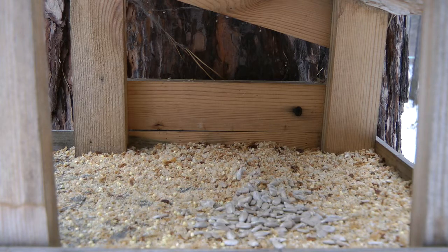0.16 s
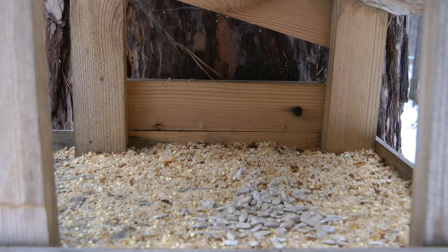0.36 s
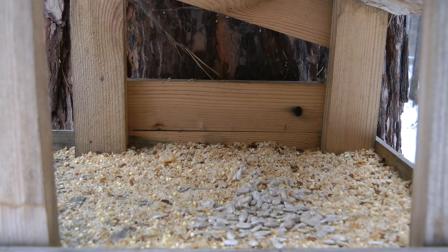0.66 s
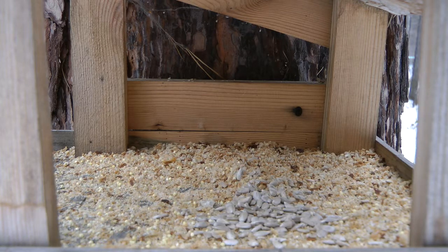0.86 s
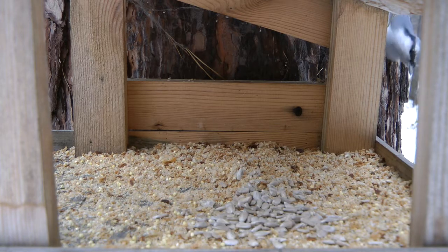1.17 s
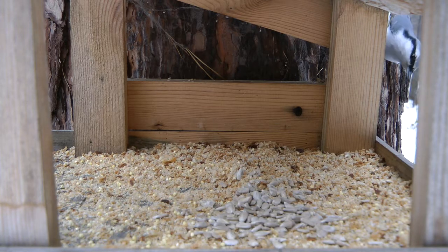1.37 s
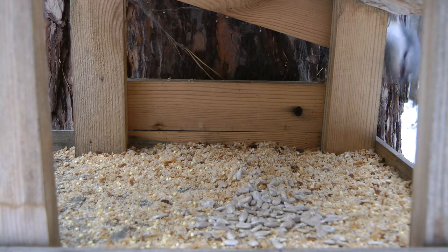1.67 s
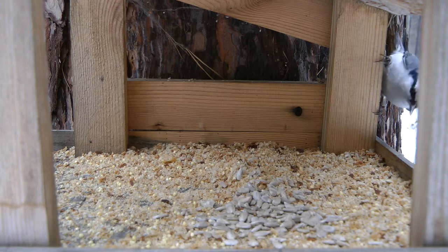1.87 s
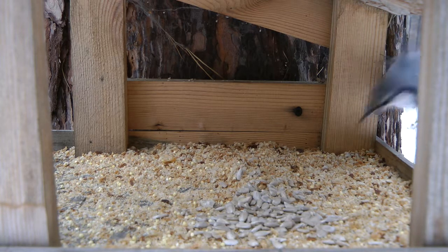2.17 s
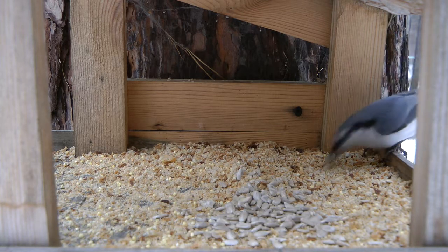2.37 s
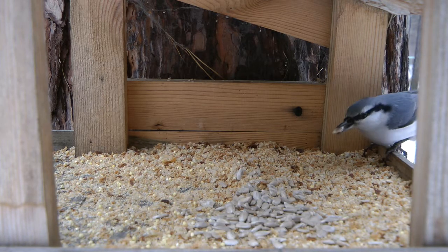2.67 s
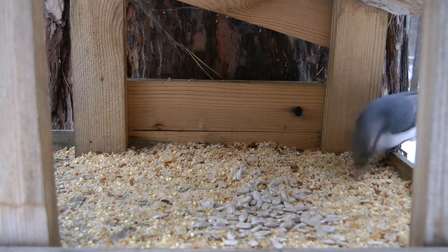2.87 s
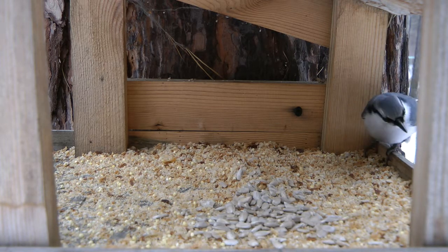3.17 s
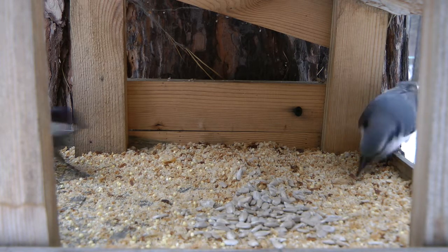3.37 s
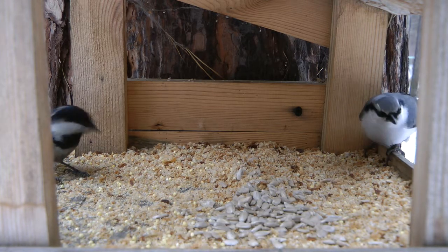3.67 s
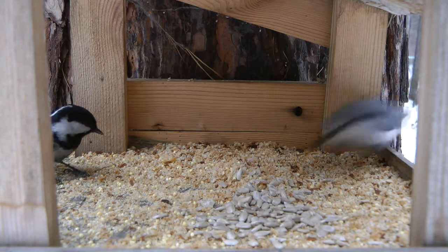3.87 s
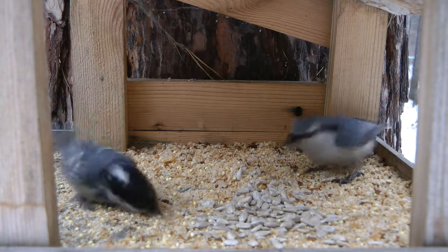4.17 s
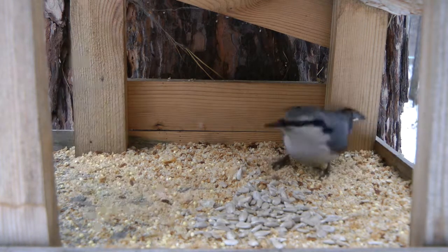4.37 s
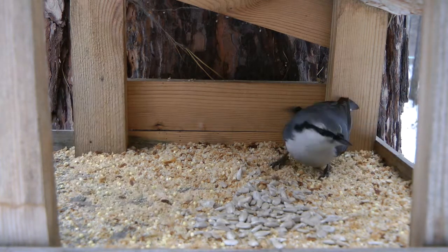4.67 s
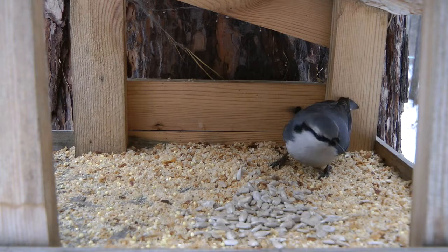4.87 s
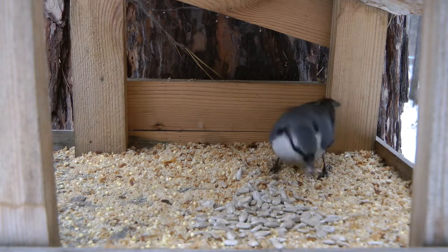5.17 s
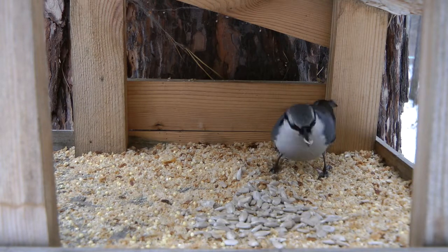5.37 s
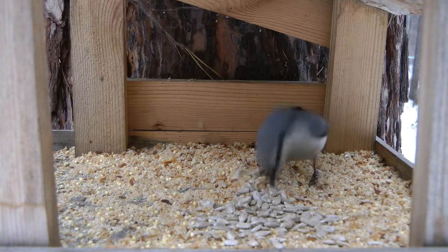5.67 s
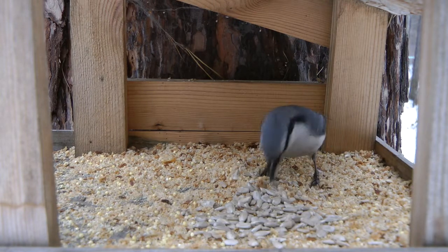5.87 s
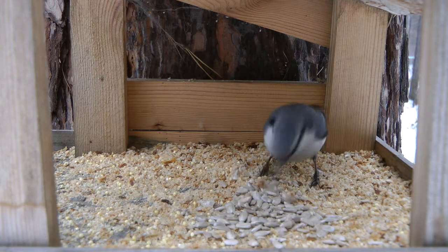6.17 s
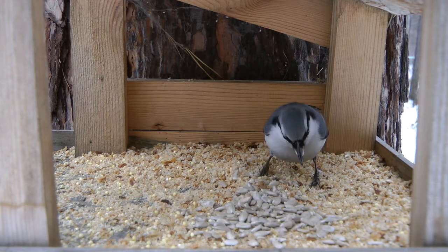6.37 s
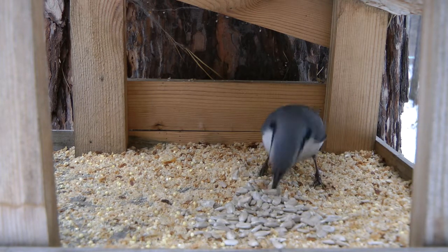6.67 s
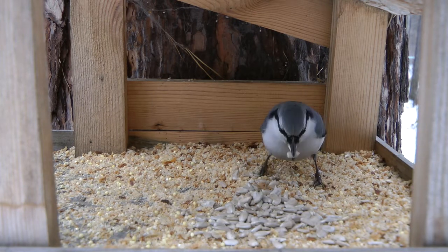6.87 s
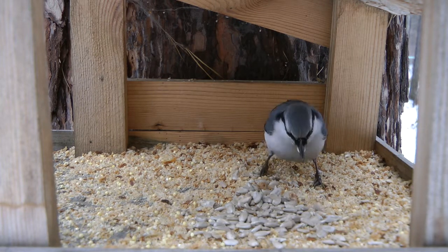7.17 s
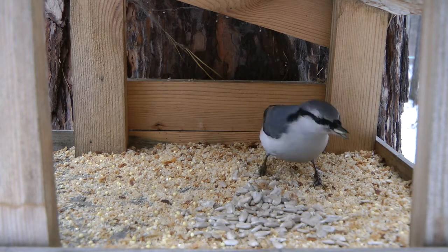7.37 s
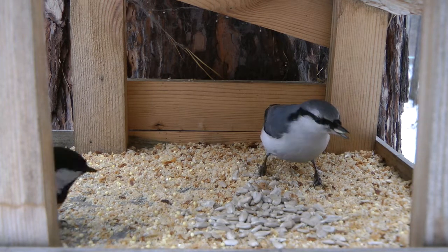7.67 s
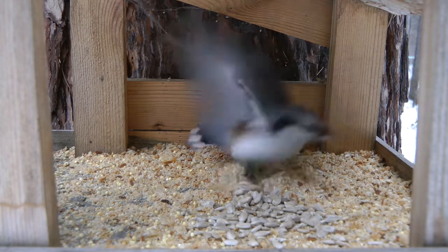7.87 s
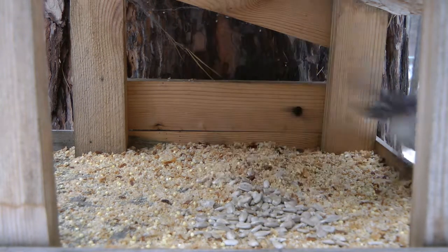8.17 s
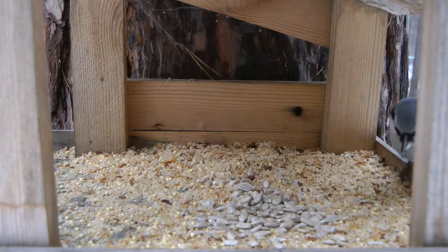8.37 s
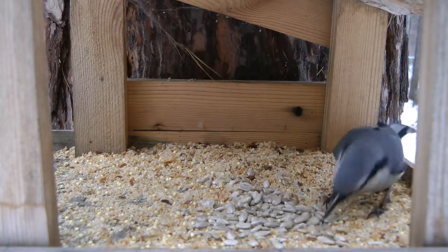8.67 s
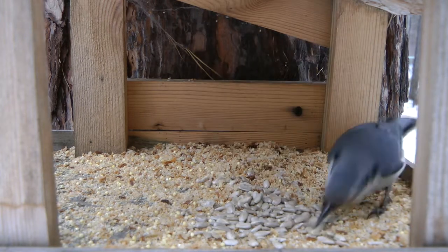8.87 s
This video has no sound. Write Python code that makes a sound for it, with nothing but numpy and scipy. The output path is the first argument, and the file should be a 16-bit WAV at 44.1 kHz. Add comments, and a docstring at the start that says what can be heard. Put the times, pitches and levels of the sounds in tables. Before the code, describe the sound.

Small birds tap and peck on a wooden seed feeder, with a sharp chirp and a rasping wing flurry over low forest hiss.

```python
"""A wooden seed feeder in a winter forest, heard from close by, where a nuthatch and tits land, hop and peck.
Claws and beaks excite the modes of the boards and crack husks; loose seed rustles in tiny collisions.
Wings puff past, and one rasps along the wood by stick-slip friction as a bird flees.
A sharp two-voiced call sounds at the feeder, and thin whistles echo among the trunks
over a far hiss and a low rumble."""
import sys
import numpy as np
from scipy import signal
from scipy.fft import rfft, irfft
from scipy.io import wavfile
from scipy.ndimage import uniform_filter1d

SR = 44100
rng = np.random.default_rng(int(sys.argv[2]) if len(sys.argv) > 2 else 0)


def generate_wav(sig):
    """Save sig (samples, or channels by samples) to the path in sys.argv[1] as 16-bit PCM at SR."""
    pcm = np.round(np.clip(np.atleast_2d(sig).T, -1, 1) * 32767).astype(np.int16)
    wavfile.write(sys.argv[1], SR, pcm)


N = 398663

# Levels in the tables are relative; pan_db is left minus right.
# Contacts of beak, claw or seed: peak_s, knock_db, scrape_db, scrape_hz, husk_db, decay_ms
CONTACTS = [(0.217, -56, -50, 4000, -46, 2.5), (0.2502, -56, -18.5, 2200, -26, 0.8),
            (0.2509, -40, -17.5, 1400, -27, 1.4), (0.257, -39, -22, 3320, -21.5, 2.2),
            (0.273, -29, -39, 1650, -43, 2.1), (0.294, -33, -33, 5200, -38, 2.3),
            (.306, -56, -38, 4000, -45, 1.2), (.316, -56, -37, 5770, -55, 0.99),
            (0.605, -30, -26, 3300, -23.5, 2.8), (0.6169, -29, -33.5, 4300, -29, 3.4),
            (0.8584, -34, -58, 2000, -33.5, 1.9), (0.8855, -54, -26.5, 2280, -23, 0.82),
            (0.8966, -56, -31.5, 3760, -27, .9), (0.9235, -40, -35, 4500, -30, 1),
            (0.9652, -51, -20, 4850, -18, 2), (0.9737, -58, -24, 4900, -46, 1.1),
            (0.981, -53, -30, 2580, -30, 3.3), (0.9865, -56, -31, 2460, -45, 5.3),
            (1.091, -56, -37, 2410, -38, 0.89), (1.119, -56, -39, 4200, -46, 1.2),
            (1.136, -56, -33, 5100, -44, 0.85), (1.149, -58, -25.5, 4830, -34, .9),
            (1.1545, -22.5, -21, 3050, -28, 0.72), (1.164, -27, -52, 1680, -39, 3.2),
            (1.1746, -23.5, -14.5, 3530, -26.5, 1.34), (1.687, -32, -34.5, 2560, -39, 2.4),
            (1.7357, -21.5, -26, 2330, -29.5, 3.9), (1.761, -26.5, -38, 1940, -30.5, 3.7),
            (1.8062, -34, -18.5, 3840, -37, 3.4), (1.84, -56, -40, 4000, -56, 2.4),
            (2.036, -54, -40.5, 4530, -66, 1.7), (2.075, -56, -41, 4560, -55, 4.6),
            (2.104, -51, -29, 4600, -65, 3.9), (2.205, -51, -40, 2860, -48, 2.3),
            (2.2583, -56, -28, 3000, -48, 2.3), (2.2691, -28.5, -36, 2800, -35, 2.8),
            (2.305, -27, -30.5, 2980, -60, 4.5), (2.673, -59, -42.5, 3680, -51, 1.9),
            (2.9048, -56, -27.5, 5000, -35, 1.5), (2.9287, -40, -21, 4270, -24.5, 2),
            (2.932, -49, -27, 1670, -52, 3.2), (2.961, -56, -39, 4000, -52, 3),
            (3.32, -39, -29.5, 4400, -62, 1.2), (3.363, -56, -55, 6100, -33, 0.84),
            (3.373, -46, -32.5, 2770, -35, 2.9), (3.407, -27, -33.5, 3160, -43, 7.6),
            (3.418, -28.5, -45, 2370, -33.5, 5.4), (3.87, -32.5, -41.5, 1700, -63, 33),
            (3.938, -52, -35, 1880, -29, 1.2), (3.949, -51, -24, 4430, -31.5, 1.7),
            (4.0726, -56, -40, 2010, -44, 5.3), (4.1202, -54, -35, 4320, -41, 4.6),
            (4.1273, -50, -35.5, 1750, -32, 5.5), (4.152, -56, -44, 1700, -48, 3.2),
            (4.226, -59, -36, 4600, -36, 13), (4.283, -56, -32, 5130, -56, 3.4),
            (4.32, -38, -30, 4900, -31, 2.9), (4.363, -54, -33.5, 6300, -40, 6.3),
            (4.379, -57, -35, 4500, -44, 3.2), (4.486, -54, -47, 4500, -45, 26),
            (4.52, -45, -40, 1700, -40, 2.8), (4.5586, -56, -32, 4900, -47, 1.5),
            (4.574, -52, -45, 1800, -41, 2.4), (4.61, -56, -43, 4500, -41, 3.8),
            (5.214, -58, -41, 4000, -46, 5.5), (5.238, -56, -44, 4000, -40, 3),
            (5.2753, -51, -36.5, 5670, -43, 2.5), (5.222, -56, -37.5, 5000, -47, 3),
            (5.332, -56, -43, 4500, -42, 3), (5.3442, -59, -19.5, 5350, -50, 1.4),
            (5.3452, -52, -18, 3230, -56, 1.5), (5.4435, -55, -25, 4400, -40, 2.1),
            (5.597, -34, -47, 2090, -45, 18), (5.637, -31, -40, 3580, -38, 7),
            (5.6737, -52, -44, 2100, -41, 3.2), (5.7124, -62, -29, 5100, -19, 1.9),
            (5.7155, -56, -27, 4500, -24, 2.1), (5.727, -46, -24, 2750, -38, 3.7),
            (5.7317, -10, -6.5, 2530, -47, 1), (5.756, -56, -34, 5100, -48, 1.5),
            (5.793, -56, -36.5, 4330, -39, 8), (5.8484, -39, -16.5, 3500, -19.5, 4),
            (5.8726, -56, -29, 4500, -23.5, 0.92), (5.8834, -56, -37, 3820, -24.5, 1.8),
            (5.894, -56, -39, 5560, -33, 1.4), (6.039, -3, -12, 3960, -19.5, 0.65),
            (6.133, -58, -38, 3800, -46, 6.2), (6.207, -59, -32.5, 3700, -46, 2.2),
            (6.2612, -50, -38, 4300, -36, 1), (6.3003, -36, -20.5, 4400, -25.5, 2.2),
            (6.3564, -32, -27, 2170, -42, 3.8), (6.381, -38, -28, 2230, -37, 3.1),
            (6.4, -38, -29.5, 4950, -38, 2.5), (6.412, -58, -30, 3450, -31.5, 6),
            (6.587, -53, -35.5, 4900, -46, 7.1), (6.633, -52, -25.5, 2900, -31, 3.6),
            (6.64, -21.5, -21, 3700, -38, 0.79), (6.6813, -56, -34, 4100, -38, 1.9),
            (6.699, -26.5, -37, 2520, -43, 12), (6.7534, -56, -34, 4020, -37, 3.2),
            (6.766, -56, -36.5, 4300, -46, 1.1), (6.825, -59, -46, 2900, -62, 1.5),
            (6.9, -56, -42, 2850, -58, 1.7), (6.974, -56, -40, 2680, -56, 2.3),
            (7.024, -22, -29, 1620, -67, 4.3), (7.0364, -30, -30.5, 3700, -58, 2.2),
            (7.1485, -58, -36, 4270, -52, 1.1), (7.1632, -34, -33.5, 2770, -51, 2.3),
            (7.201, -54, -26.5, 4200, -30, 3.7), (7.214, -56, -33, 3830, -42, 1.7),
            (7.2415, -56, -31, 4170, -28.5, 1), (7.247, -56, -35, 5900, -34, 1.1),
            (7.2683, -56, -26, 4300, -27.5, .9), (7.2788, -56, -25, 4450, -33, 0.83),
            (7.2943, -54, -25, 5950, -41, 0.88), (7.3152, -58, -24, 2260, -20.5, 0.97),
            (7.336, -33, -25.5, 5750, -24.5, 3.2), (7.387, -56, -35, 2100, -64, 6.7),
            (7.6375, -51, -31.5, 1560, -35, 8.5), (7.6493, -53, -28.5, 4260, -38, 5.3),
            (7.662, -56, -29.5, 4500, -36, .9), (7.68, -56, -35.5, 4420, -31.5, 14),
            (7.8116, -33, -38, 2000, -41, 2.9), (7.8723, -51, -28, 4500, -36, 4.7),
            (7.8809, -20.5, -27, 5000, -49, 4.1), (7.904, -35, -24, 5250, -40, 1.3),
            (7.973, -47, -27, 5130, -30, 4.8), (7.982, -32, -25, 4340, -24.5, 2.5),
            (8.336, -56, -44, 5000, -43, 2.1), (8.415, -58, -57, 5930, -57, 2.7),
            (8.452, -58, -52, 3500, -57, 4), (8.488, -54, -47.5, 4600, -57, 9),
            (8.524, -56, -41, 3500, -50, 4.4), (8.587, -32, -28.5, 4860, -30, 4.4),
            (8.595, -54, -29, 1800, -25, 3.5), (8.6001, -50, -14.5, 5440, -20, 0.6),
            (8.6069, -35, -18.5, 4500, -34, 2.3), (8.686, -63, -27.5, 4280, -47, 3.9),
            (8.7422, -65, -26, 4200, -50, 2.6), (8.7712, -63, -33.5, 3230, -40, 13.5),
            (8.843, -40, -23.5, 2920, -67, 8.1), (8.864, -56, -33, 4530, -37, 3.2),
            (8.8872, -60, -31.5, 5000, -39, 2.9), (8.916, -57, -29, 4500, -37, 1),
            (9.004, -58, -35, 4370, -37, 2.2)]
# Modes of the feeder's boards: frequency_hz, level_db, t60_s
BOARD_MODES = [(200, -30, .13), (400, -24, .05), (520, -11, .03), (610, -16, .035), (720, -16, .05),
               (830, -19, .04), (1090, -2, .022), (1210, -5, .025), (1500, -4, .012), (1870, -1, .016),
               (2460, -7, .013), (4250, -11, .01), (4870, -14, .01)]
# Wing beats of a bird flying close by: start_s, beat_count, level_db, decay_ms
FLYBYS = [(.086, 3, -40, 9), (2.3905, 5, -39, 3)]
# Wing strokes along the wood: start_s, end_s, first_db, last_db, brightness_db, tension_ratio
WING_STROKES = [(7.888, 7.97, -46, -39, -3, 0.86), (8.011, 8.053, -21.5, -26, -6, 1.01),
                (8.034, 8.086, -24, -24.5, 1, 0.92), (8.091, 8.128, -29, -22, -2, 1.27),
                (8.136, 8.169, -27.5, -19, 1, 1.08), (8.186, 8.215, -20.5, -20.5, 6, 0.88),
                (8.235, 8.265, -19.5, -23.5, 5, 0.74), (8.296, 8.316, -21, -24, 4, 0.67)]
# Resonances of a feather: centre_hz, width_hz, level_db
FEATHER_BANDS = [(1740, 300, 2), (2420, 480, 3), (3250, 370, 0.5), (4230, 800, -6.5), (5200, 770, -10.5),
                 (7300, 930, -7.5), (10500, 630, -17)]
# A bird shuffling through loose seed: peak_s, level_db, brightness_db, swell_s, settle_s
SEED_SHUFFLES = [(.2, -60, -14, 0.98, 0.28), (1.16, -54, -17, 0.089, 0.1), (1.78, -57, -5.5, 0.43, 0.1),
                 (2.09, -58.5, -19, 0.06, 0.057), (2.261, -46, -24, 0.034, 0.03),
                 (2.34, -53.5, -30, 0.1, 0.14), (2.95, -57, -19, 0.11, 0.046),
                 (3.41, -59.5, -14, 0.21, 0.15), (3.95, -51.5, -26, 0.079, 0.22),
                 (4.342, -48, 2, 0.22, 0.097), (4.56, -53, -3, 0.15, 0.29), (5.14, -54, -4, 0.14, 0.42),
                 (5.36, -53, -16, 0.055, 0.049), (5.72, -51, -12, 0.24, 0.059),
                 (5.86, -52.5, -1, 0.19, 0.072), (6.04, -50.5, -23, 0.04, 0.025),
                 (6.375, -48, -14, 0.068, 0.13), (6.69, -59.5, -20, 0.26, 0.16),
                 (7.03, -54.5, -27, 0.11, 0.13), (7.33, -58, 5, 0.2, 0.086), (7.52, -60, -3, 0.11, 0.12),
                 (7.68, -65.5, 8, .05, 0.32), (7.88, -45.5, -25, 0.16, 0.9), (8.01, -52.5, -28, 0.075, 1),
                 (8.6, -48.5, -23, 0.03, 0.074), (8.86, -61.5, 1, 0.11, 0.17), (8.98, -59, -9, 0.21, 0.066)]
# The two sides of the voice box in the sharp call: time_s, pitch_hz, level_db, octave_db
UPPER_SYRINX = [(3.794, 5820, -50, 0), (3.8, 6880, -21, -11), (3.803, 7550, -26, -7),
                (3.808, 8020, -28, -16), (3.816, 8350, -28, -29), (3.822, 8480, -27, -27),
                (3.829, 8100, -38, -30)]
LOWER_SYRINX = [(3.796, 4760, -41, -3), (3.803, 6130, -45, 3), (3.805, 7020, -12.5, -20),
                (3.81, 7260, -26, -16), (3.815, 7600, -39, -8), (3.819, 7330, -27, -22),
                (3.822, 7070, -16.5, -34), (3.831, 6670, -33, -24), (3.835, 6440, -45, -30)]
# Arched notes from the trees: start_s, length_s, first_hz, middle_hz, last_hz, level_db, pan_db
TREE_NOTES = [(0.399, 0.05, 4080, 3990, 4030, -64, -14), (0.406, 0.016, 6600, 7130, 7300, -63, -8),
              (1.588, 0.022, 6800, 7500, 6900, -40, -7), (1.584, 0.024, 8660, 9500, 8960, -45.5, -6),
              (2.956, 0.047, 7350, 7070, 6400, -58, -15), (2.997, 0.054, 7150, 7050, 7050, -62, -14),
              (3.403, 0.013, 6300, 6970, 7100, -44, -6), (3.616, 0.033, 7600, 7780, 7500, -67, -8),
              (3.725, 0.049, 7200, 7500, 7600, -68, -10), (3.72, 0.039, 3800, 4060, 4030, -63, -15),
              (4.988, 0.034, 6800, 8020, 7200, -44.5, -12), (4.989, 0.015, 4900, 5760, 6450, -51, -10),
              (5.14, 0.031, 5900, 7130, 7240, -53, -8), (5.141, 0.019, 8560, 8850, 8950, -59, -2),
              (5.522, 0.031, 6350, 7600, 7500, -42.5, -20), (5.573, 0.033, 8900, 9160, 9000, -57.5, -3.5),
              (5.581, 0.02, 6660, 7120, 7000, -47.5, -9), (6.127, .035, 7400, 6900, 6350, -60, -5),
              (6.834, 0.038, 7600, 7580, 7000, -61, -7), (7.53, 0.071, 6900, 7700, 7100, -65, -3),
              (8.622, 0.029, 6200, 8200, 8700, -50, -11), (8.641, 0.021, 6240, 6840, 6500, -52, -16),
              (8.753, 0.032, 7200, 6650, 6300, -50, -16), (8.979, 0.035, 7600, 7200, 6440, -62, -10)]
# Where the busiest bird is: time_s, pan_db
BIRD_POSITION = [(0, -11), (1.2, -8), (1.8, -6), (3, -7.5), (4.3, -6), (5.75, -8), (6.4, -5), (7.3, -8.5),
                 (8, -6), (8.75, -8), (9.04, -9)]
# Spectra of the far hiss and of the rumble: frequency_hz, density_db
HISS_SPECTRUM = [(88, -55), (150, -53), (249, -6.5), (431, -5.5), (601, -1), (1100, -4.5), (1210, 0.5),
                 (1360, -5), (1560, -8), (2700, -20), (3770, -25), (4080, -25), (4320, -24), (14500, -37.5),
                 (16000, -39)]
RUMBLE_SPECTRUM = [(8.8, -44), (15, -27), (45, -1.5), (65, 2), (93, -1.5), (155, -19.5), (220, -18),
                   (290, -34), (480, -120)]
# Stereo balance of the hiss: frequency_hz, pan_db
HISS_BALANCE = [(200, 0.5), (400, -8.5), (1300, -9), (4400, -6.5), (15000, -17.5)]

BEAT_S, BEAT_FADE_DB, BEAT_HZ = .0505, .5, 4600  # wing beats: period, loss per beat, centre of the puff
RING_DB, RING_Q = -5, 10  # a claw or husk rings briefly at its own pitch
SHUFFLE_SPAN_DB = 20  # level change over one swell_s or settle_s
STILL_DB, STILL_BRIGHT_DB = -76, -6  # seed at rest
HISS_DB, RUMBLE_DB, TOP_HZ = -48.5, -55, 16000


def contact(board_db, scrape_db, scrape_hz, husk_db, decay_ms, lead_s):
    """Impact excitation: a flurry of micro-impacts drives damped board modes, a scrape and a crack."""
    t = np.arange(4096) / SR
    late = t - lead_s
    noise = rng.standard_normal((2, len(t)))
    colour = rng.standard_normal((2, len(BOARD_MODES) + 2, 1))
    burst = undb(np.where(late < 0, 22000, -9500) * late / max(decay_ms, 1))
    faint_halo = undb(-29 - 1500 * np.abs(late))  # a faint smear of noise just before and after each tap
    hits = noise[0] * undb(3 * np.abs(noise[1])) * (burst + faint_halo)

    hz, db, t60 = np.transpose(BOARD_MODES)[:, :, None]
    light_db = min(board_db + 12, 0) * np.clip(2.4 - hz / 600, 0, 1)  # only hard blows move it all
    # the place of the blow sets each mode's share and bends its pitch a little
    mode_db = db + light_db + 1.8 * colour[0, 2:]
    mode_hz = hz * (1 + .02 * colour[1, 2:])
    modes = undb(mode_db - 60 * t / t60) * np.cos(2 * np.pi * mode_hz * t)
    blow = peak(hits * (burst + faint_halo), -16)
    blow += np.exp(-(late / .00007) ** 2) / 5  # one firm push amid the flurry
    knock = band(signal.fftconvolve(blow, modes.sum(axis=0))[:len(t)], 1100, 5000)

    loose = min(scrape_hz / 3500, 1)  # deep contacts are hollow and ring narrow
    scrape = steep_band(hits, scrape_hz, .65 * loose * scrape_hz)
    scrape += undb(-5) * loose ** 2 * steep_band(hits, 2400, 2600)
    scrape += undb(RING_DB) * band(hits, scrape_hz, scrape_hz / RING_Q)
    husk = steep_band(hits, 8000 * undb(.9 * colour[0, 0, 0]), 4000)
    husk += undb(-10 + 2.5 * colour[0, 1, 0]) * steep_band(hits, 12500, 7000)
    return peak(knock, board_db) + peak(scrape, scrape_db) + peak(husk, husk_db)


def taps_and_wing_beats():
    """Superposition of transients: irregular contacts, and soft wing puffs at an even rate."""
    out, lead_s = np.zeros((1, N)), .02
    beats = [(s + k * BEAT_S, -56, db - k * BEAT_FADE_DB, BEAT_HZ, db - 2, decay_ms)
             for s, count, db, decay_ms in FLYBYS for k in range(count)]
    for peak_s, *settings in CONTACTS + beats:
        add(out, contact(*settings, lead_s)[None], peak_s - lead_s)
    return out


def wing_rasp():
    """Stick-slip friction: barbs snap over the wood edge and excite the feather's resonances."""
    out, slip_hz = np.zeros((1, N)), 1900
    for start, end, first_db, last_db, bright_db, tension in WING_STROKES:
        n = int((end - start) * SR)
        spacing, strength, air = rng.standard_normal((3, 4000))
        slips = np.cumsum(SR / slip_hz * undb(2.5 * spacing[:200])).astype(int)
        slips = slips[slips < n]
        snaps = .05 * air
        snaps[slips] += undb(2.2 * strength[:len(slips)])  # one-sided pulses
        # after the stroke the air and loose seed settle
        envelope_db = [first_db - 9, first_db, last_db, last_db + 8, last_db - 16, -60]
        snaps *= undb(np.interp(np.arange(4000), [0, 110, n, n + 1, n + 220, 4000], envelope_db))
        rasp = sum(undb(db + bright_db * (hz > 3300))
                   * steep_band(snaps, hz * (tension if hz < 3300 else 1), 2.1 * width_hz)
                   for hz, width_hz, db in FEATHER_BANDS)
        add(out, undb(17.5) * rasp[None], start)
    out = signal.lfilter(*signal.butter(1, 800, "high", fs=SR), out)
    return signal.lfilter(*signal.butter(5, 10500, fs=SR), out)  # a soft vane has no finer edge


def seed_stirring():
    """Incoherent addition: shuffles sum in power to set the gains of the big and the small grains."""
    t = np.arange(0, N / SR + .01, .001)
    big, small = undb(2 * STILL_DB), undb(2 * (STILL_DB + STILL_BRIGHT_DB))
    for s, db, bright_db, swell_s, settle_s in SEED_SHUFFLES:
        fall_db = SHUFFLE_SPAN_DB * np.where(t < s, (s - t) / swell_s, (t - s) / settle_s)
        power = undb(2 * (db - fall_db))
        big, small = big + power, small + power * undb(2 * bright_db)
    return curve(np.transpose([t, np.sqrt(big), np.sqrt(small)]))


def seed_rustle():
    """Shot noise: random seed clicks come in flurries; small grains tick high, big ones scuff the wood."""
    big_gain, small_gain = seed_stirring()
    clicks = (rng.random((2, N)) < 3000 / SR) * rng.standard_normal((2, N))  # 3000 a second
    clicks *= undb(2.5 * np.minimum(rng.exponential(size=(2, N)), 5))  # uneven sizes
    big, small = unit_rms(clicks) * undb(3.6 * wander(120))
    scuff = band(big, 1410, 1620) + undb(-10) * (band(big, 1775, 170) - band(big, 2780, 210))
    scuff += undb(-6.5) * band(small, 3000, 2700)
    return undb(12.5) * big_gain * scuff + small_gain * steep_band(small, 6000, 16000)


def sharp_call():
    """Biphonation: the two sides of the syrinx whistle at once, roughened by rushing air."""
    out = np.zeros((1, N))
    for voice in (UPPER_SYRINX, LOWER_SYRINX):
        s, hz, db, octave_db = np.transpose(voice)
        t = np.arange(s[0], s[-1], 1 / SR)
        air = 1 + .052 * rng.standard_normal(SR // 10)[:len(t)]
        pitch_hz = uniform_filter1d(np.interp(t, s, hz), 90)
        tone = whistle(pitch_hz, undb(np.interp(t, s, db)), np.interp(t, s, octave_db), roughness=.12)
        add(out, (tone * air)[None], s[0])
    return out


def far_notes():
    """Multipath scattering: the trunks smear near-sine whistles and send back a thin tail."""
    out = np.zeros((2, N))
    for s, length_s, first_hz, middle_hz, last_hz, db, pan_db in TREE_NOTES:
        progress = np.linspace(0, 1, int(length_s * SR))
        hz = np.polyval(np.polyfit([0, .5, 1], [first_hz, middle_hz, last_hz], deg=2), progress)
        gain = undb(db) * np.sin(np.pi * progress) ** .31
        add(out, pan(whistle(hz, gain, octave_db=-36, roughness=.15), pan_db), s)
    return out + undb(1.5) * echoes(out, .04, .001) + undb(-8) * echoes(out, .35, .02)


def whistle(hz, gain, octave_db, roughness):
    """Random modulation: a tone and its octave tremble rapidly in frequency and amplitude."""
    tremble = 5 * uniform_filter1d(rng.standard_normal((2, SR // 10)), size=25)[:, :len(hz)]
    phase = 2 * np.pi * np.cumsum(hz * (1 + .05 * roughness * tremble[0])) / SR
    octave = undb(octave_db) * np.sin(2 * phase) * (hz < 8300)
    return gain * (1 + roughness * tremble[1]) * (np.sin(phase) + octave)


def echoes(x, t60_s, wait_s):
    """Diffuse reverberation: reflections decay exponentially, independently in each channel."""
    t = np.arange(int(t60_s * SR)) / SR
    tail = rng.standard_normal((2, SR))[:, :len(t)] * undb(-60 * t / t60_s) * (t > wait_s)
    return signal.fftconvolve(x, tail / np.sqrt(t60_s * SR / np.log(1e6)), axes=1)[:, :N]


def hiss_and_rumble():
    """Spatial coherence: the far hiss is independent in the two channels, the rumble nearly shared."""
    noise = rfft(rng.standard_normal((4, N)))
    tilt = np.sqrt(spectral_gain(HISS_BALANCE))
    hiss = irfft(noise[:2] * spectral_gain(HISS_SPECTRUM) * np.array([tilt, 1 / tilt]), N)
    side = .13 * noise[3] * np.array([[1], [-1]])
    rumble = irfft((noise[2] + side) * spectral_gain(RUMBLE_SPECTRUM), N)
    hiss = undb(HISS_DB + 1.2 * wander(2.1)) * unit_rms(hiss)
    return hiss + undb(RUMBLE_DB + .8 * wander(1.5)) * unit_rms(rumble)


def undb(db):
    return 10 ** (np.asarray(db) / 20)


def unit_rms(x):
    return x / np.sqrt(np.mean(x ** 2))


def peak(x, db):
    return x * undb(db) / np.abs(x).max()


def add(out, x, start_s):
    i = int(start_s * SR)
    out[:, i:i + x.shape[1]] += x[:, :N - i]


def pan(x, db):
    """Level-difference panning: left exceeds right by db."""
    return x * undb(np.array([[.5], [-.5]]) * db) * 2 / (undb(db / 2) + undb(-db / 2))


def band(x, hz, width_hz):
    """Second-order resonance."""
    return signal.lfilter(*signal.iirpeak(min(hz, .45 * SR), hz / width_hz, fs=SR), x)


def steep_band(x, hz, width_hz):
    """Two like resonances in cascade."""
    return band(band(x, hz, width_hz), hz, width_hz)


def curve(rows):
    """Linear interpolation of (time_s, value, ...) rows at every sample."""
    s, *columns = np.transpose(rows)
    return [np.interp(np.arange(N) / SR, s, c) for c in columns]


def spectral_gain(points):
    """Log-frequency interpolation of (frequency_hz, level_db) points to a gain for each bin."""
    hz, db = np.transpose(points)
    return undb(np.interp(np.log(np.arange(N // 2 + 1) * SR / N + 1), np.log(hz), db))


def wander(rate_hz):
    """Smoothed noise: random values joined by ramps of 1 / rate_hz seconds."""
    k = int(SR / rate_hz)
    return uniform_filter1d(np.repeat(rng.standard_normal(N // k + 1), k), k)[:N]


def scene():
    """Superposition: direct sound from the feeder, its reflections and the forest behind."""
    call, rasp = sharp_call(), wing_rasp()
    feeder = taps_and_wing_beats() + seed_rustle() + call
    pan_db = curve(BIRD_POSITION)[0]
    direct = pan(feeder + rasp, pan_db)
    brightened = signal.lfilter([1, -.8], 1, pan(feeder + undb(-7) * rasp, pan_db))
    posts_and_roof = undb(-8) * echoes(brightened, t60_s=.012, wait_s=.0003)
    call_tail = undb(-29) * echoes(pan(call, -6), t60_s=.35, wait_s=.01)
    return direct + posts_and_roof + call_tail + far_notes() + hiss_and_rumble()


def record(dry):
    """Soft saturation rounds the loudest peaks; a steep low-pass cuts the top."""
    rounded = .8 * np.tanh(dry / .8)
    return signal.sosfilt(signal.ellip(10, .2, 70, TOP_HZ, fs=SR, output="sos"), rounded)


dry = scene()
out = record(dry)
generate_wav(out)
```